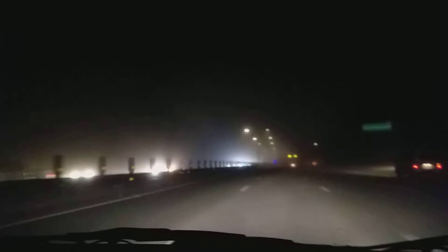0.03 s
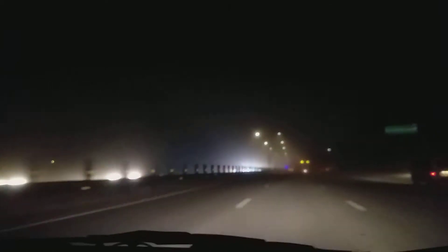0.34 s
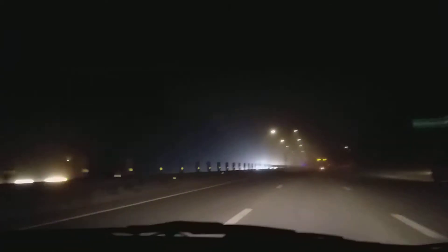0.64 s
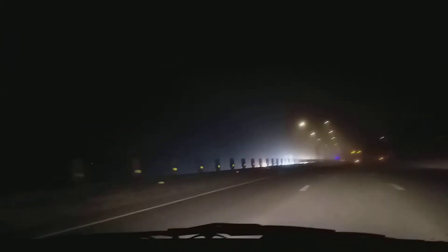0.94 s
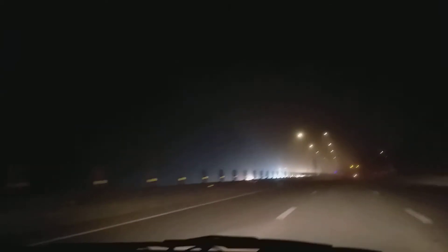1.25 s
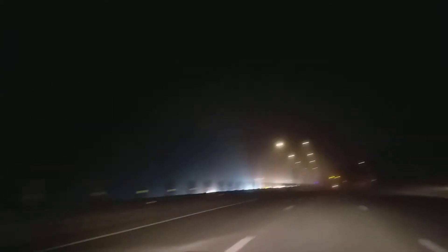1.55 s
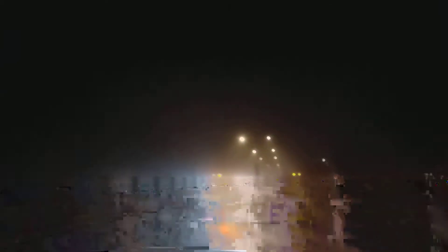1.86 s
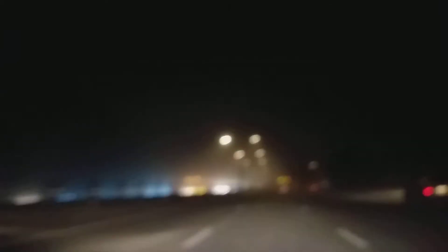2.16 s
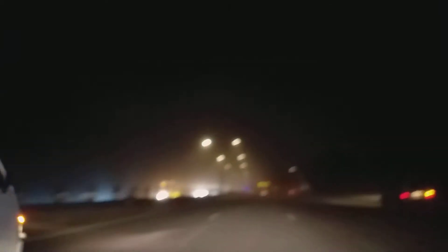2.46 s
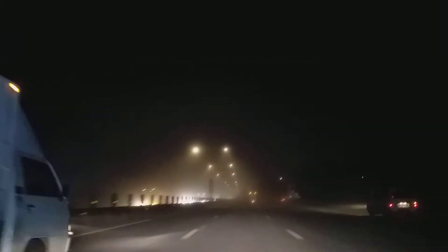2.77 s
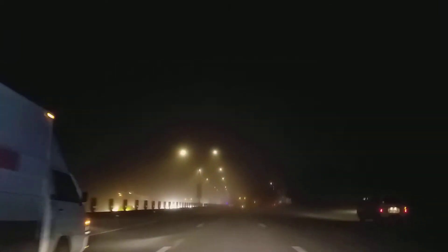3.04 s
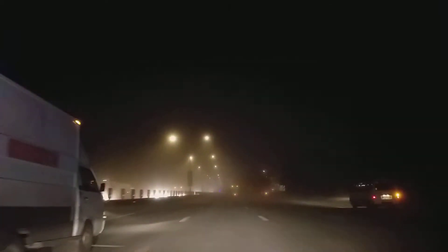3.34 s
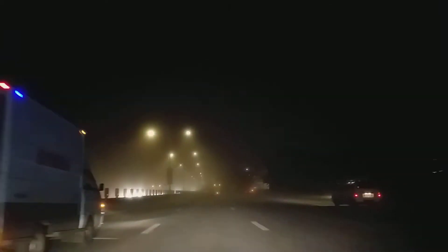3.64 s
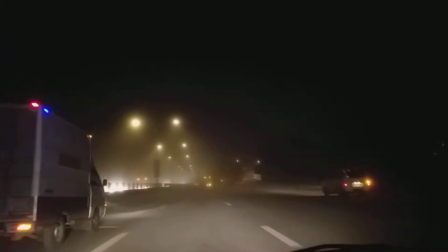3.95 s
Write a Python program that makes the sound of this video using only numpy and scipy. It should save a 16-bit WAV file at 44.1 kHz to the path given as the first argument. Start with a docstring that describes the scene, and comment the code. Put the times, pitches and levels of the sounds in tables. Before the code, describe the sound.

Inside a moving car, an indicator clicks in a steady tick-tock as road rumble and low engine hum fade in and hold. The microphone is in the cabin, catching a few faint snaps of loose plastic trim.

```python
"""Turn signal on the highway

Inside a cruising car, fading in from silence. Tyres and wind rumble in the cabin's resonances,
the engine and drivetrain drone low, and loose trim gives tiny snaps. Over this bed the
turn-signal relay ticks: a firmer click as it closes, a thinner one as it opens."""
import sys
import numpy as np
from scipy import signal
from scipy.fft import rfft, irfft
from scipy.io import wavfile
from scipy.ndimage import uniform_filter1d

SR = 44100
rng = np.random.default_rng(int(sys.argv[2]) if len(sys.argv) > 2 else 0)


def store_pcm(level_fs):
    """Save levels as 16-bit WAV."""
    pcm = np.round(np.clip(level_fs, -1, 1) * 32767).astype(np.int16)
    wavfile.write(sys.argv[1], SR, np.atleast_2d(pcm).T)


N = 176400


def undb(db):
    """Decibels to gain."""
    return 10 ** (np.asarray(db) / 20)


def unit(x):
    """Scale to rms 1."""
    return x / np.sqrt(np.mean(x ** 2))


def curve(rows, column=1):
    """Automation lane: one column of a table, joined by straight lines in time."""
    rows = np.array(rows)
    return np.interp(np.arange(N) / SR, rows[:, 0], rows[:, column])


def coloured_noise(n, rows, column=1, boost_db=0):
    """n samples of noise through an EQ curve drawn from a table, plus an optional boost."""
    rows = np.array(rows)
    hz = np.fft.rfftfreq(n, 1 / SR)
    eq_db = np.interp(np.log(hz + 1), np.log(rows[:, 0]), rows[:, column])
    return irfft(rfft(rng.standard_normal(n)) * undb(eq_db + boost_db), n)


def drift(rate_hz):
    """Smooth random modulation with rms 1."""
    hold = int(SR / rate_hz)
    steps = np.repeat(rng.standard_normal(N // hold + 1), hold)
    return unit(uniform_filter1d(uniform_filter1d(steps, hold), hold)[:N])


def decay(t, t60):
    """Exponential ring-down, 60 dB in t60 seconds."""
    return np.exp(-np.log(1000) * t / t60)


def add(out, start_s, sound):
    """Mix a sound in at its cue."""
    i = int(start_s * SR)
    out[i:i + len(sound)] += sound[:max(N - i, 0)]


def road():
    """Tyre and wind noise through the cabin's resonances; each upper octave flickers on its own."""
    # tone of the road and wind: f/Hz, level/dB
    road_eq = [(20, -42), (31, -36), (38, -9), (55, -2.5), (80, -1.5), (150, 0), (215, -3), (240, -8.5),
               (320, -8.5), (390, -15), (530, -15), (590, -19), (850, -22), (1300, -28), (1900, -31.5),
               (3000, -38.5), (4400, -36.5), (5700, -42.5), (7900, -43), (8900, -54.5), (15500, -56)]
    # cabin and tyre resonances: f/Hz, width/Hz, boost/dB
    resonances = [(177, 10.1, 7.5), (215.8, 17.6, 4), (265, 14, 5), (313.2, 20, 5), (486, 46, 6.5),
                  (532, 29, 4.5), (619, 21, 5), (819, 19, 2)]
    # fader ride of the deep rumble: t/s, gain/dB
    rumble_ride = [(.4, -13), (.65, -2.5), (.8, 1.5), (1.5, 0), (2.7, 0.5), (4, 2.5)]
    # fader ride of the roar and hiss above it: t/s, gain/dB
    roar_ride = [(.4, 1.1), (.9, -.2), (1.5, .3), (2.1, 0.7), (2.6, 0.57), (3.1, 0), (4, -0.55)]
    crossover_hz, flicker_db, gain_db = 115, .76, -25.5
    hz = np.fft.rfftfreq(N, 1 / SR)
    boost_db = sum(db / (1 + (2 * (hz - f) / width) ** 2) for f, width, db in resonances)
    spectrum = rfft(unit(coloured_noise(N, road_eq, boost_db=boost_db)))
    lows = 1 / (1 + (hz / crossover_hz) ** 8)
    out = irfft(spectrum * lows, N) * undb(curve(rumble_ride))
    octave = np.clip(np.log2((hz + 1) / crossover_hz), 0, 6)
    for k in range(7):
        band = irfft(spectrum * (1 - lows) * np.maximum(1 - abs(octave - k), 0), N)
        flicker = flicker_db * drift(rate_hz=18) / (1 + k * .2)  # steadier towards the top
        out += band * undb(curve(roar_ride) + flicker)
    return out * undb(gain_db)


def hum(rows, waver_hz=.35, waver_db=1.0):
    """A sine that wavers about its pitch and level automation."""
    hz = curve(rows) + waver_hz * drift(rate_hz=7.99)
    level_db = curve(rows, column=2) + waver_db * drift(rate_hz=9)
    return unit(np.sin(2 * np.pi * np.cumsum(hz) / SR)) * undb(level_db)


def drivetrain():
    """The drivetrain's low boom, swelling and sinking."""
    # path of the boom: t/s, f/Hz, level/dB
    boom = [(.4, 68, -46), (1, 67.63, -33), (1.5, 67.7, -33), (1.65, 68.05, -26.5), (1.85, 68.3, -41),
            (2.13, 68.4, -27.5), (2.6, 69.5, -24), (2.9, 69.8, -29), (3.35, 69.2, -30.5), (3.55, 67.5, -44),
            (4, 67.3, -33)]
    return hum(boom)


def engine():
    """The engine's drone, about an octave above the boom."""
    # path of the drone: t/s, f/Hz, level/dB
    drone = [(.4, 133.3, -35.5), (.95, 133.7, -31.5), (1.25, 133.2, -36), (1.43, 133, -27.5),
             (1.8, 133, -31), (1.98, 132.6, -24), (2.2, 132.2, -28.5), (2.55, 131.8, -29.5),
             (3.1, 132.2, -29), (3.55, 131.5, -27.5), (3.86, 130.6, -23), (4, 130.5, -28.5)]
    return hum(drone)


def loose_trim():
    """Tiny bright snaps of plastic: a few clear ones among a faint random rattle."""
    # the clear snaps: t/s, gain/dB
    snaps = [(1.583, -49), (1.6285, -43), (1.8604, -52), (2.917, -50), (3.2976, -48), (3.4228, -49),
             (3.7695, -51)]
    # tone of a snap: f/Hz, level/dB
    snap_eq = [(2000, -6), (7000, 7), (9500, 1), (15500, -1)]
    rattle_count, rattle_db, spread_db = 40, -56, 2.5
    rattle = [(rng.uniform(0, N / SR), rattle_db + spread_db * rng.standard_normal())
              for _ in range(rattle_count)]
    out, t = np.zeros(N), np.arange(SR // 20) / SR
    for start_s, db in snaps + rattle:
        add(out, start_s, undb(db) * coloured_noise(len(t), snap_eq) * decay(t, t60=.015))
    return out


def relay_tick(ring_db, clack_db, opening):
    """One stroke of the armature: the relay rings, and its clack scatters through the dashboard."""
    # relay modes: f/Hz, t60/s, closing level/dB, opening level/dB
    modes = [(1854, .04, -5, -20), (2030, .04, -7, -15), (2430, 0.045, -4.5, -3.5), (4000, 0.054, -8, -6),
             (4530, 0.044, -8, -14), (5960, .035, -8, -15), (6310, 0.046, -6, -10), (6720, .04, -11, -17),
             (7410, .05, 1, -1.5), (7570, .04, -4, -2), (7990, 0.046, 1.5, -3), (8150, .045, -1.5, -1),
             (8680, .045, -8, -14), (9380, .05, -16, -17), (10900, .04, -22, -9)]
    # tone of the clack: f/Hz, closing level/dB, opening level/dB
    clack_eq = [(700, -18, -18), (1900, 1.5, -4), (3200, -5.5, -4), (5200, -10.5, -15), (6100, -1.5, -14.5),
                (7700, -4.5, 0), (9000, -11, -10.5), (11000, -18, -15), (15500, -24, -19)]
    ring_attack_s, clack_attack_s, chatter_s = .0028, .0023, .0058
    t = np.arange(SR // 10) / SR
    settled = np.maximum(t - chatter_s, 0)  # the decay waits while the contacts chatter
    ring = np.zeros(len(t))
    for hz, t60, close_db, open_db in modes:
        accent, detune, phase = rng.standard_normal(3)
        gain = undb((open_db if opening else close_db) + 1.3 * accent)
        partial = np.sin(2 * np.pi * (hz * (1 + .003 * detune) * t + phase))
        ring += gain * partial * decay(settled, t60)
    ring *= np.minimum(t / ring_attack_s, 1)
    clack = unit(coloured_noise(len(t), clack_eq, column=2 if opening else 1))
    cabin_tail = undb(-14) * decay(settled, t60=.11)
    clack *= np.minimum(t / clack_attack_s, 1) ** .5 * (decay(settled, t60=.046) + cabin_tail)
    return undb(ring_db) * ring + undb(clack_db) * clack


def turn_signal():
    """The relay closes and opens once a blink."""
    # accent of each blink in turn: closing gain/dB, opening gain/dB
    blinks = [(0.5, 0.5), (1.5, .3), (.5, -0.3), (-0.5, -.3), (-1.5, -1)]
    first_tick_s, period_s, lit_s = .6422, .6868, .3432
    out = np.zeros(N)
    for k, (close_db, open_db) in enumerate(blinks):
        start_s = first_tick_s + k * period_s
        add(out, start_s, relay_tick(ring_db=-42, clack_db=-39, opening=False) * undb(close_db))
        add(out, start_s + lit_s, relay_tick(ring_db=-46.5, clack_db=-43, opening=True) * undb(open_db))
    return out


def scene():
    """The cabin in mono: a low driving bed with the clicks on top."""
    bed = road() + drivetrain() + engine()
    return (bed + turn_signal() + loose_trim())[None]


def record(dry):
    """A fade-in from silence and a steep high cut."""
    fade_start_s, fade_s, high_cut_hz = .4, .55, 15800
    fade = np.clip((np.arange(N) / SR - fade_start_s) / fade_s, 0, 1) ** .65
    high_cut = signal.ellip(10, .2, 90, high_cut_hz, fs=SR, output="sos")
    return signal.sosfilt(high_cut, dry * fade)


dry = scene()
out = record(dry)
store_pcm(out)
```